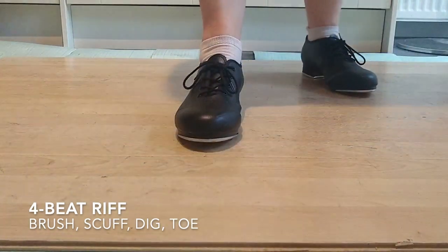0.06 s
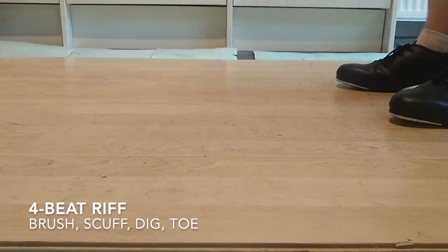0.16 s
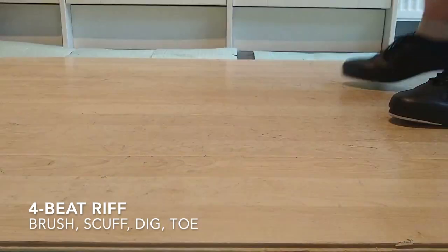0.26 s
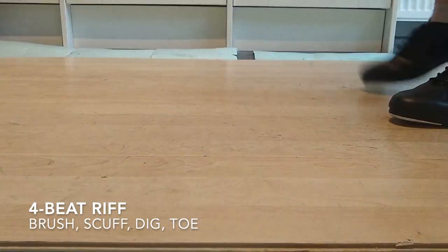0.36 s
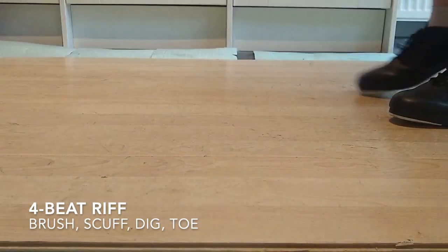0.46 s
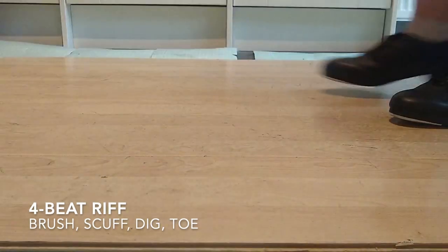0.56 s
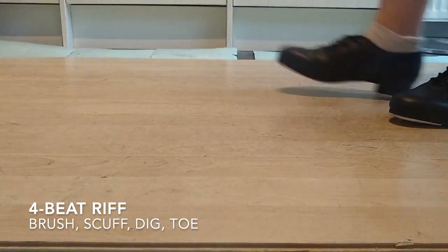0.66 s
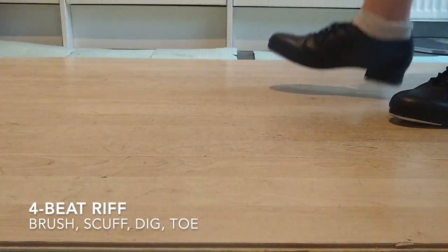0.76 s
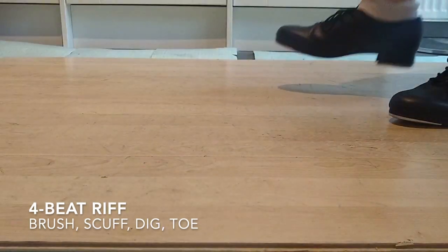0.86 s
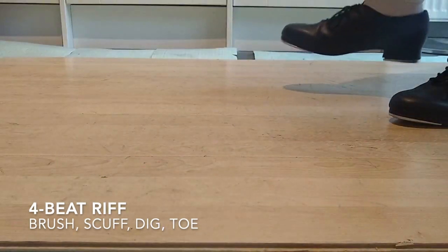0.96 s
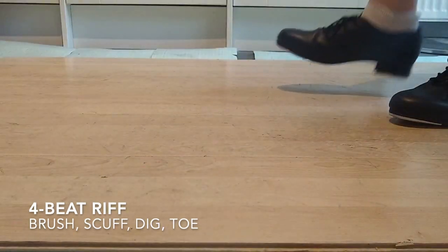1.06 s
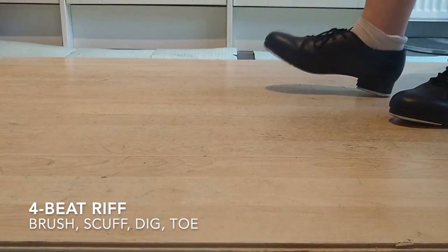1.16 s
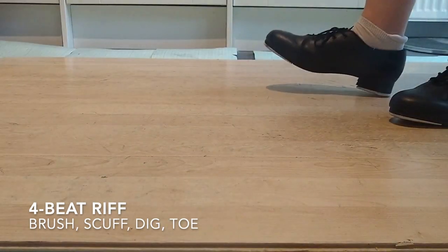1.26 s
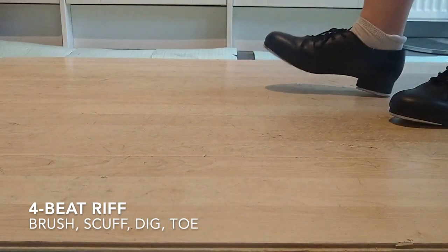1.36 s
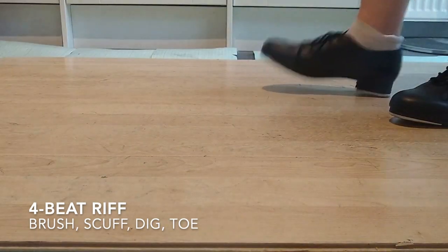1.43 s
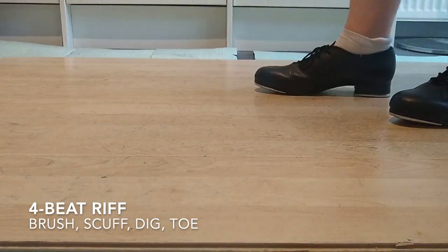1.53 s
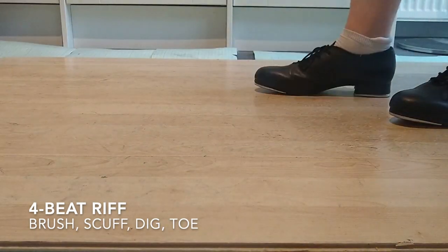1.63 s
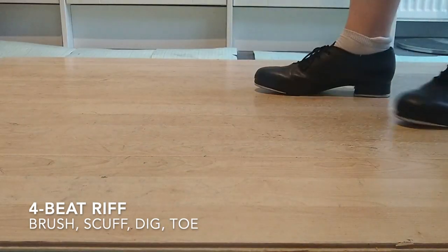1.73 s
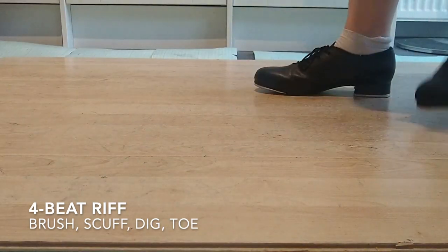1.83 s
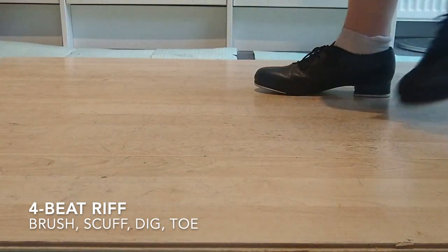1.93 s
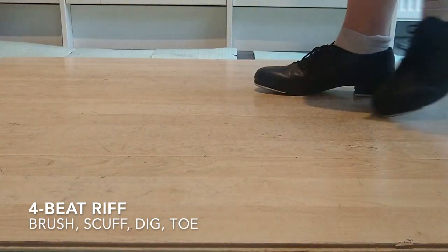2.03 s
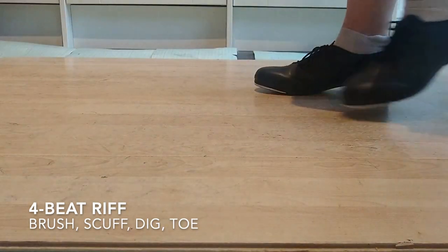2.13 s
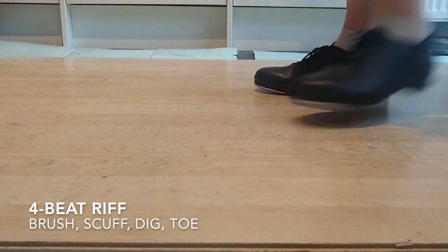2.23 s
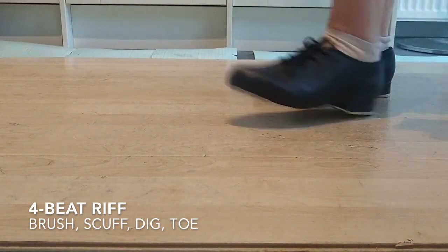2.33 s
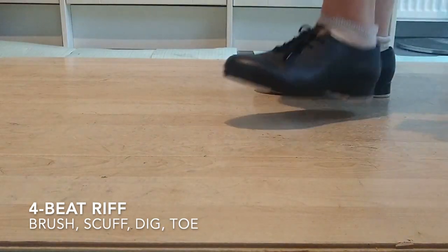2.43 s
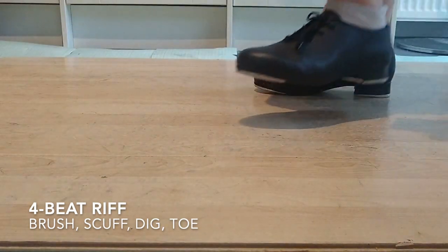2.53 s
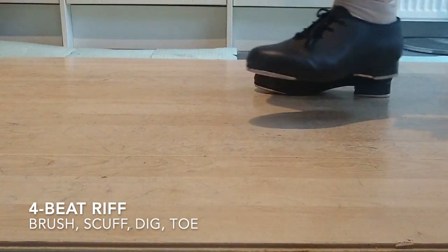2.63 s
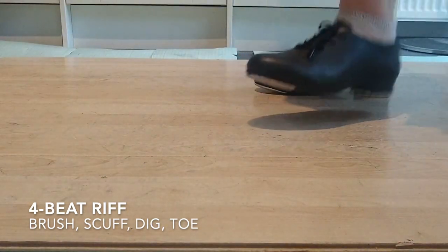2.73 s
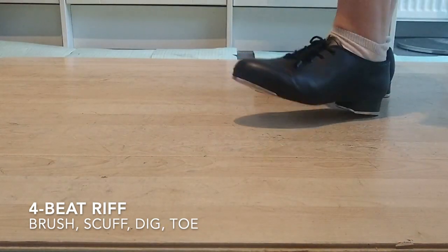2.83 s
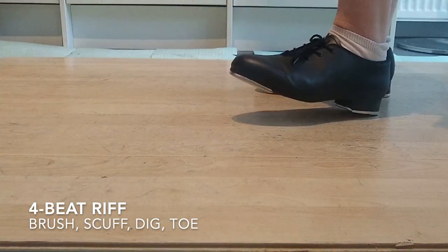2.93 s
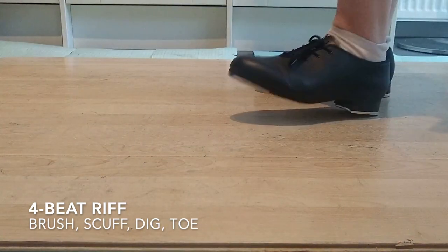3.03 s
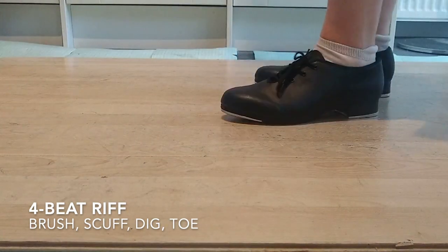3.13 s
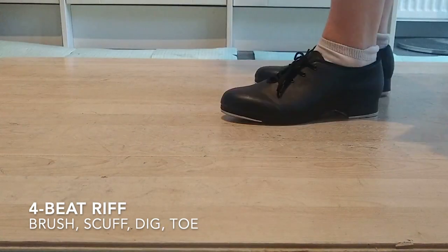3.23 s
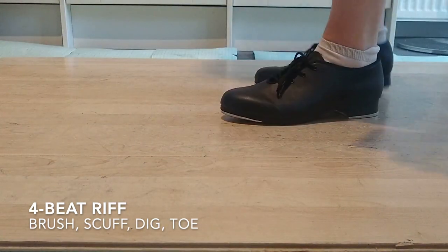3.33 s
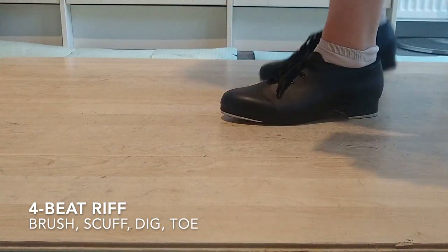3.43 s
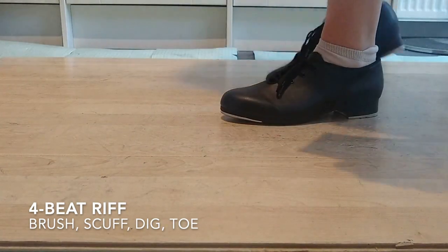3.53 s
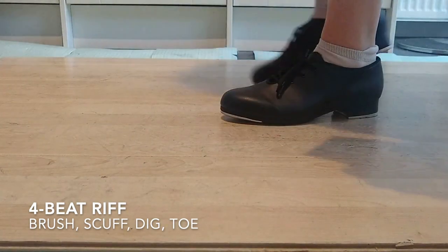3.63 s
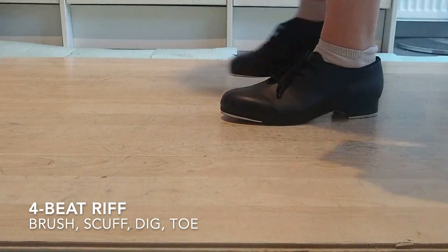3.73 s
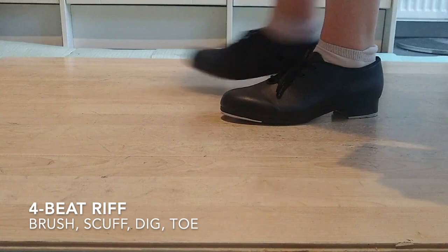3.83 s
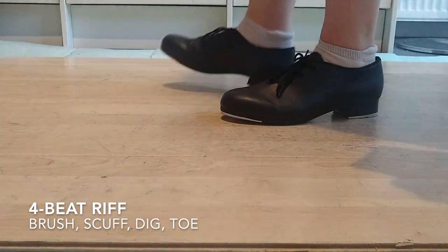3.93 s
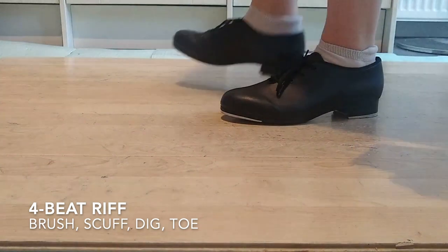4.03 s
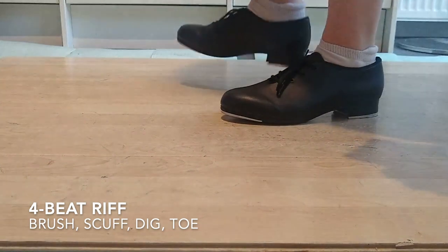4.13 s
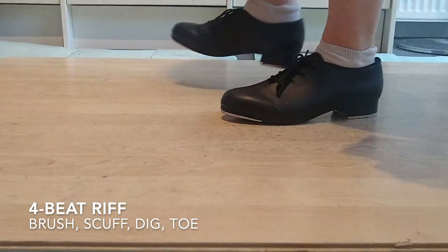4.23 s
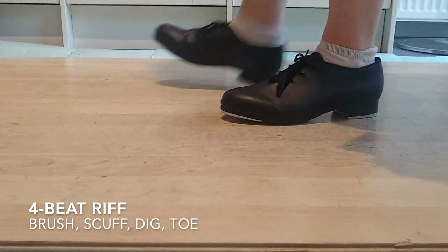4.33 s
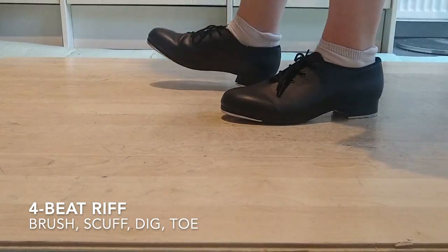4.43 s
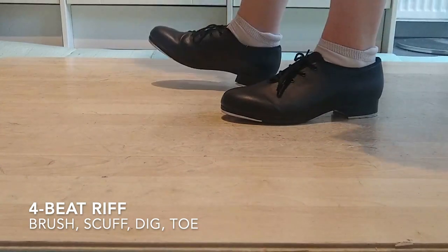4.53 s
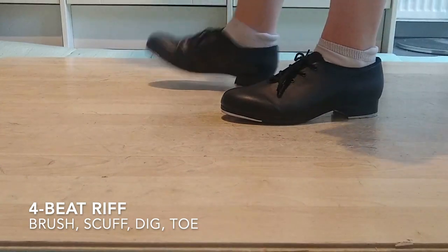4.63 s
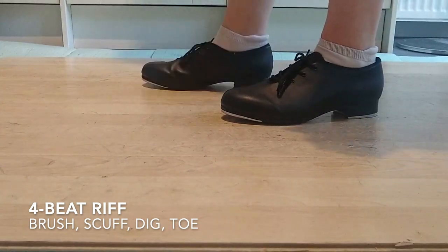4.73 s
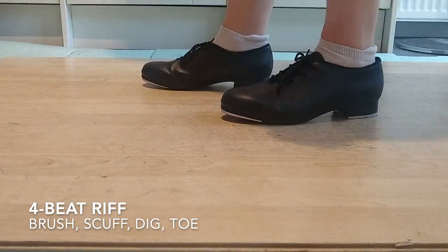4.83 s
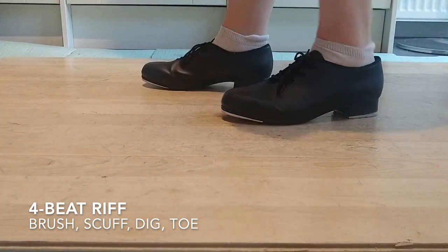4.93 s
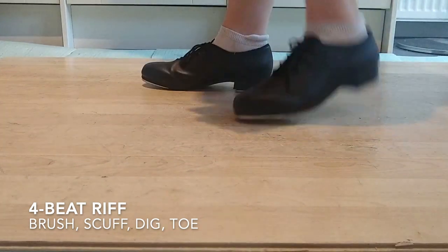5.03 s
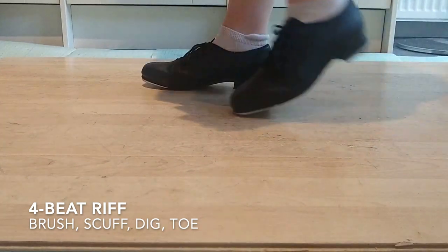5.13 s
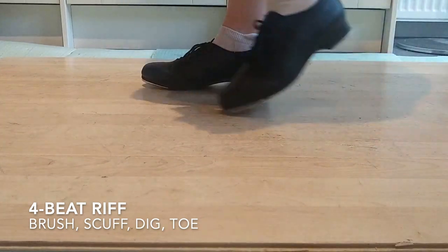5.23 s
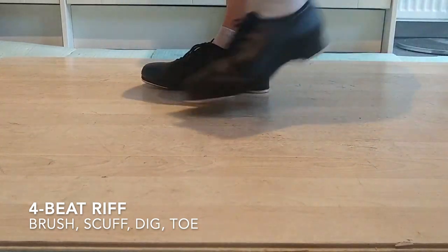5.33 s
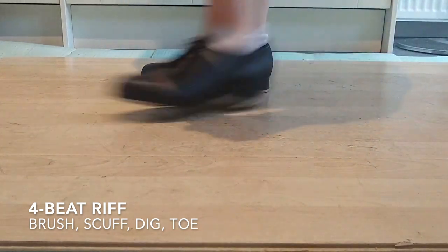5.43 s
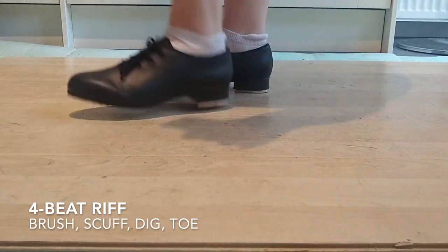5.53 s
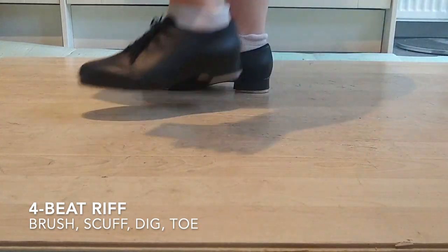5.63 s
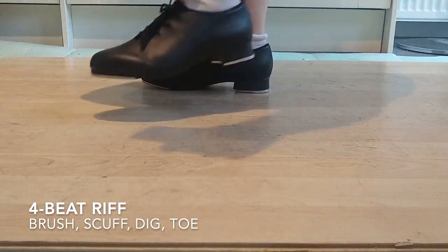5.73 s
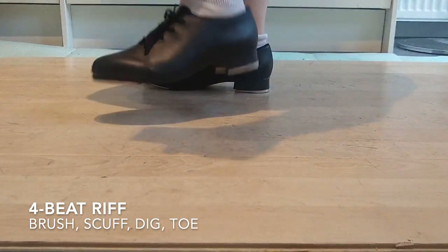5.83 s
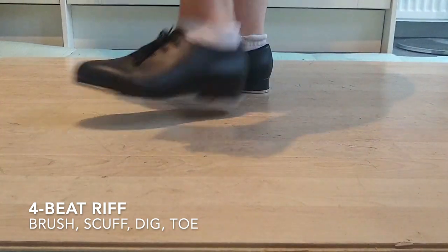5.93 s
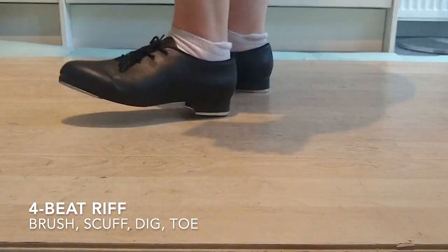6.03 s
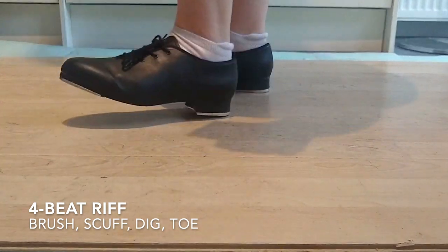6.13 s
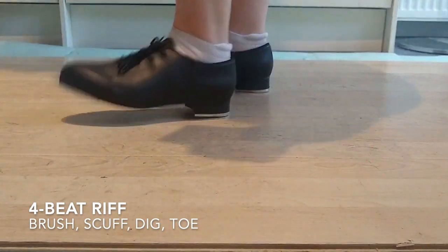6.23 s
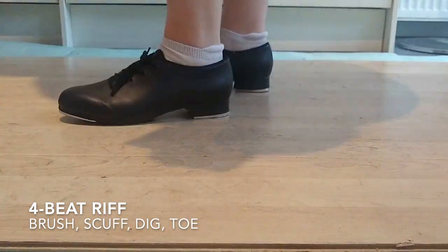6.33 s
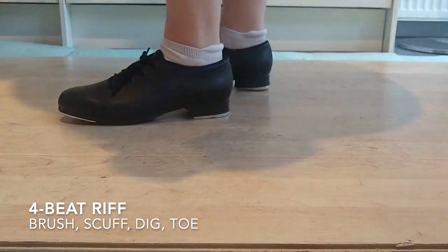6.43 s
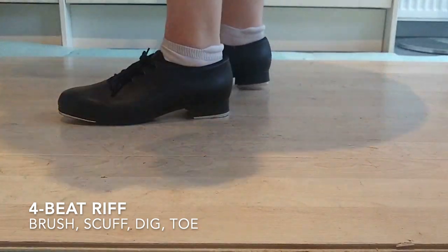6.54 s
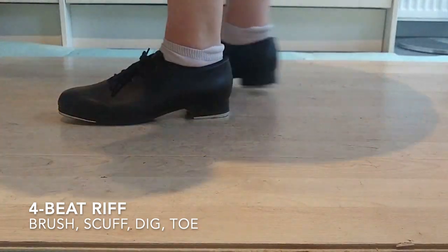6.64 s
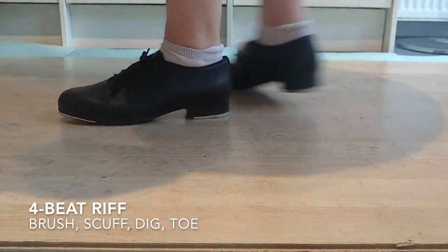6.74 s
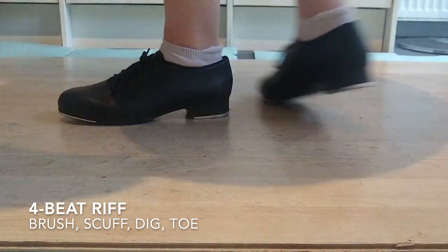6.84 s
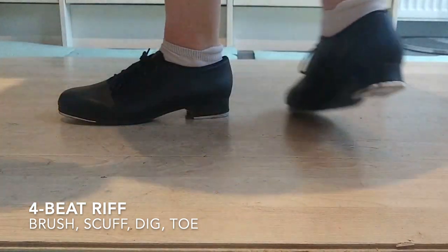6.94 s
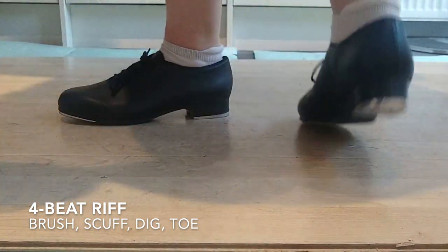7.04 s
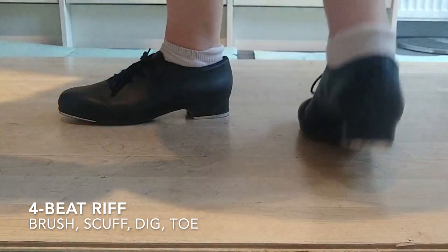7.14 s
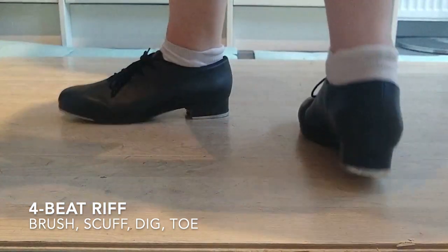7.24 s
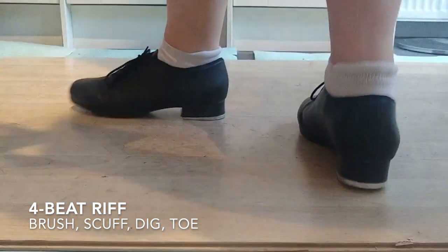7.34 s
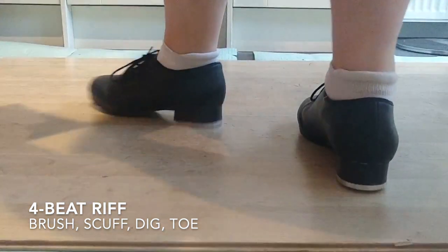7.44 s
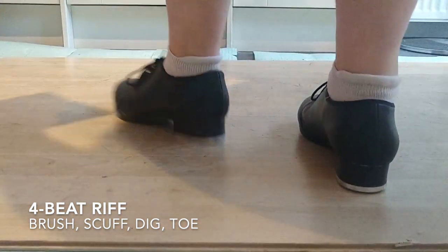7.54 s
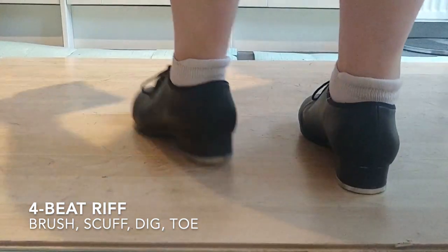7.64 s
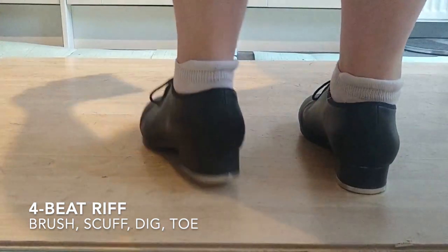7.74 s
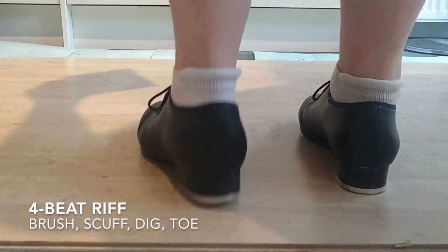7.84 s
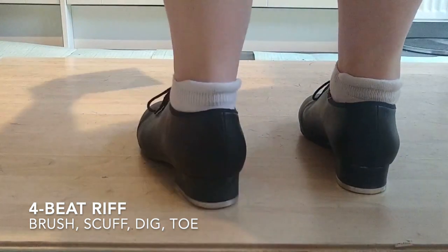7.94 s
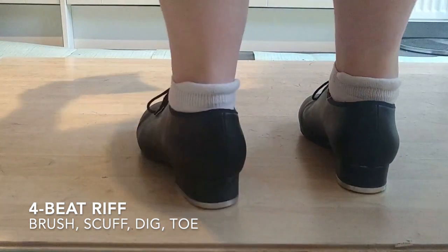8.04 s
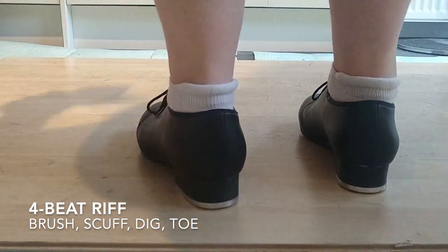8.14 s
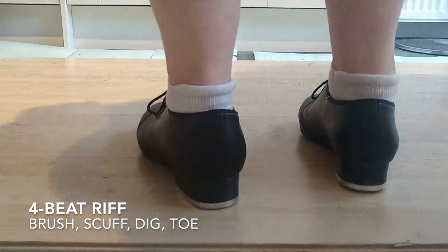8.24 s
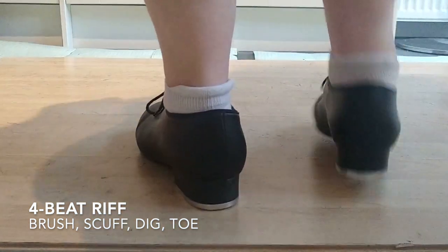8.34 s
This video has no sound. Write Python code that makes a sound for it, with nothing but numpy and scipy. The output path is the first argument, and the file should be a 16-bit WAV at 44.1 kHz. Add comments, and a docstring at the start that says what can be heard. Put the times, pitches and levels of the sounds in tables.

```python
"""Tap dance on a board

Steel-plated shoes tap across a wooden board in a bare room, close to a phone lying on the floor.
Each blow clicks the plate (shaped noise) and rings the board (damped modes); the room answers (decaying noise).
Soles slide as grainy noise over a steady hush; the first taps and their echoes break off at a cut.
The phone steers its two ports left and right, lowers the fading tails and holds the peaks down."""
import sys
import numpy as np
from scipy import signal
from scipy.fft import rfft, irfft, next_fast_len
from scipy.io import wavfile
from scipy.ndimage import uniform_filter1d, minimum_filter1d

SR = 44100
rng = np.random.default_rng(int(sys.argv[2]) if len(sys.argv) > 2 else 0)


def wav_out(sig):
    """Save sig, one row per channel (or a flat mono array), as 16-bit PCM at SR to the path in sys.argv[1]."""
    wavfile.write(sys.argv[1], SR, np.round(np.clip(np.atleast_2d(sig).T, -1, 1) * 32767).astype(np.int16))


N = 369558
LEAD = SR // 2  # samples kept ahead of time zero for a blow that starts earlier
SWELL_S = .006  # a faint swell of the ring leads into each click, this long
PORTS_S = 0.0004497  # sound needs this long from one port to the other


def gain_of(db):
    """Decibel definition: amplitude ratio of a level difference."""
    return 10 ** (np.asarray(db) / 20)


def evened(x):
    """Normalisation to unit root mean square."""
    return x / np.sqrt(np.mean(x ** 2) + 1e-20)


def read(points, hz):
    """Interpolation of (Hz, value) points along a logarithmic frequency axis."""
    f, value = np.transpose(points)
    return np.interp(np.log(hz + 1), np.log(f + 1), value)


def at_time(points, s):
    """Linear interpolation of (s, value) points."""
    return np.interp(s, *np.transpose(points))


def colour(x, points):
    """Zero-phase filtering: the spectrum is weighted by a table of (Hz, dB)."""
    hz = np.fft.rfftfreq(x.shape[-1], 1 / SR)
    return irfft(rfft(x) * gain_of(read(points, hz)), x.shape[-1])


def add(mix, s, sound):
    """Superposition: a sound joins the mix at its start time."""
    part = mix[:, round(s * SR) + LEAD:][:, :sound.shape[1]]
    part += sound[:, :part.shape[1]]


# modes of the wooden board: pitch_hz, level_db (relative), t60_s (at ring length factor 1)
BOARD_MODES = [(145, 11.5, 0.018), (177.6, 1.5, 0.033), (266, -5, 0.033), (318.2, -12.5, 0.047),
               (371.6, 10.5, 0.08), (398.3, -8, 0.23), (456.5, 3.5, 0.052), (520.4, -2, 0.042),
               (631, -3.5, 0.046), (705.3, -3, 0.056), (786.6, -3.5, 0.051), (892, -6.5, 0.037),
               (1022, -5, 0.019), (1288, -4, 0.018), (1523, -2, 0.018)]
# anchors of the ring's spectrum, pitch_hz: thud, deep, middle, high ring and knock
RING_ANCHORS = (205, 341, 429.5, 770, 1310)
KNOCK_DB = -11.5  # the knock sits under the tilt
THUD_DB, THUD_PER_LENGTH_DB = -7.5, -24.5  # a weighted blow rings short and thuds deep


def board_ring(t, row, chance):
    """Modal synthesis: damped sinusoids whose levels depend on the spot of the blow."""
    _, click_db, mid_db, deep_db, tilt_db, _, length = row
    octaves = np.log2(np.array(RING_ANCHORS[3:]) / RING_ANCHORS[2])
    high_db, knock_db = mid_db + tilt_db * octaves
    thud_db = click_db + THUD_DB + THUD_PER_LENGTH_DB * length
    anchor_db = (thud_db, mid_db + deep_db, mid_db, high_db, knock_db + KNOCK_DB)
    hz, db, t60 = (column[:, None] for column in np.transpose(BOARD_MODES))
    spot_db = np.interp(np.log(hz), np.log(RING_ANCHORS), anchor_db)
    detune = 1 + 0.022 * chance[-len(hz):, None]
    phase = 0.15 * chance[-2 * len(hz):-len(hz), None]  # the modes do not start quite in step
    decay_db = 60 * np.maximum(t, 0) / (t60 * length)
    modes = gain_of(db + spot_db + 0.5 - decay_db) * np.sin(2 * np.pi * (hz * detune * t + phase))
    # a faint swell leads into the click, then the ring builds up within a few ms
    swell = np.where(t < 0, .07 * np.exp(t / .002), 1 - .95 * np.exp(-t / .0005))
    return modes.sum(0) * swell


# spectrum of the steel plate: pitch_hz, level_db (relative, before the edge of each blow)
PLATE_COLOUR = [(800, 2), (1800, 7.5), (3200, 5), (4400, 2.5), (5500, -1.5), (6800, -5), (9500, -12.5),
                (13000, -14), (16500, -31.5)]


def plate_click(t, row, chance):
    """Impact excitation: an impulse and decaying chatter, as heard directly and all round."""
    _, click_db, _, _, _, edge_db, length = row
    # the loose plate chatters on its screws
    rattle = chance * (t > 0) * (.5 * np.exp(-t / 0.00089) + 0.11 * np.exp(-t / 0.017))
    strike = -signal.unit_impulse(len(t), np.argmax(t > 0))
    bright_db = edge_db + 22.5  # full from 8 kHz up, none below 4 kHz
    plate = [(f, db + bright_db * np.clip(f / 4000 - 1, 0, 1)) for f, db in PLATE_COLOUR]
    # over all directions the chatter evens out, so the room is fed a plain click
    direct = rattle + 2.33 * length * strike
    all_round = 0.073 * rattle + 4.19 * strike
    return gain_of(click_db + 0.5) * colour(np.array([direct, all_round]), plate)


def blow(row, chance):
    """Superposition of plate click and board ring; one row as heard directly, one all round."""
    t = np.arange(len(chance)) / SR - SWELL_S
    return board_ring(t, row, chance) + plate_click(t, row, chance)


def at_ports(sound, lead_ms):
    """Interaural-style cues: time lead between the ports, and shading by the phone's body."""
    hz = np.fft.rfftfreq(len(sound), 1 / SR)
    delay_ms = np.array([[.5 - lead_ms / 2], [.5 + lead_ms / 2]])
    late = np.exp(-2j * np.pi * hz * delay_ms / 1000)
    shading = gain_of([[1.5], [-1.5]])
    return irfft(rfft(sound) * late * shading, len(sound))


# level of the room's answer, lower where the dancer is near the phone: time_s, level_db (relative)
ROOM_SHARE = [(.1, 0.5), (.55, 0.5), (.9, -4), (2.1, -4), (3.5, -4.5), (5.5, -8), (6.9, -8.5), (7.2, -12.5),
              (8, -14.5)]
# direction of the direct sound: time_s, lead_ms (sooner at the left port)
BEARING = [(2.5, -.02), (3.7, -.014), (4, .015), (6.4, .02), (7, -.015), (7.3, .014)]


def shoes(rows, tails):
    """Direct and reverberant field: every blow at the ports, and convolved with its room tail."""
    mix = np.zeros((2, N + LEAD))
    chance = rng.standard_normal((len(rows), 8192))
    for row, draw, tail in zip(rows, chance, tails):
        direct, all_round = blow(row, draw)
        start = row[0] - SWELL_S
        add(mix, start, at_ports(direct, at_time(BEARING, row[0])))
        answer = signal.fftconvolve(all_round[None], tail, axes=1)
        add(mix, start, gain_of(at_time(ROOM_SHARE, row[0])) * answer)
    return mix[:, LEAD:]


# soles sliding on the board: full_from_s, level_db (relative), rise_s, hold_s, fall_s
SLIDES = [(0.319, -46, 0.079, 0.056, 0.24), (1.887, -41.5, 0.17, 0.0092, 0.017),
          (6.969, -28, 0.0089, 0.043, 0.051), (7.158, -39.5, .01, 0.022, 0.024),
          (7.402, -44, 0.091, 0.068, 0.062), (7.607, -33, 0.046, 0.017, 0.07),
          (7.682, -33, .02, 0.026, 0.068), (7.74, -33, .06, 0.024, 0.06), (7.853, -47, .2, 0.093, 0.11)]
SLIDE_ENDS_DB = -28  # relative level one rise before, or one fall after, the full slide


def slide_level(t, full, db, rise, hold, fall):
    """Exponential envelope: a slide swells, holds and dies away."""
    away = np.maximum((full - t) / rise, (t - full - hold) / fall)
    return gain_of(db + SLIDE_ENDS_DB * np.maximum(away, 0))


# spectrum of a sliding sole: pitch_hz, level_db (relative)
SLIDE_COLOUR = [(150, -9.5), (380, -0.5), (460, 9.5), (560, -5), (1200, -9.5), (3200, -11.5), (6000, -25.5),
                (15000, -39.5)]


def slides(tail):
    """Friction noise: grit under the sole slips in uneven grains, coloured and echoed by the room."""
    t = np.arange(N) / SR
    grain_db = 1.38 * rng.exponential(1, N // 64 + 1)
    grit = rng.standard_normal(N) * gain_of(grain_db).repeat(64)[:N]
    level = sum(slide_level(t, *row) for row in SLIDES)
    dry = evened(colour(grit, SLIDE_COLOUR)) * uniform_filter1d(level, 400)
    answer = signal.fftconvolve(dry[None], tail, axes=1)[:, :N]
    return 0.47 * dry + gain_of(-16.5) * answer


def diffuse(noise):
    """Diffuse-field coherence: sound from all sides is alike in the bass, unrelated in the treble."""
    same = .97 * np.sinc(2 * np.fft.rfftfreq(noise.shape[-1], 1 / SR) * PORTS_S)
    a, b = rfft(noise[..., 0, :]), rfft(noise[..., 1, :])
    return irfft(np.stack([a, same * a + np.sqrt(1 - same ** 2) * b], -2), noise.shape[-1])


# reverberation time of the room: pitch_hz, t60_s
ROOM_DECAY = [(120, 0.43), (320, 0.41), (840, 0.63), (2200, 0.72), (5800, 0.68), (14000, 0.45)]
# spectrum of the room's answer: pitch_hz, level_db (relative)
ROOM_COLOUR = [(100, 13.5), (250, 4.5), (500, -0.5), (1000, 4.5), (3000, 4.5), (7000, 2.5), (15000, -0.5)]
# standing waves of the room: pitch_hz, level_db (relative), t60_s
STANDING = [(95, -16, 0.15), (147.1, -18.5, 0.61), (193.2, -13.5, 0.43), (294, -23, 0.57)]


def rooms(count):
    """Statistical reverberation: one noise tail pair a spot, each band dying at its own speed."""
    hz, t, z = signal.stft(diffuse(rng.standard_normal((count, 2, 32768))), SR, nperseg=512)
    decay_db = 60 * t / read(ROOM_DECAY, hz)[:, None]
    z = z * gain_of(read(ROOM_COLOUR, hz)[:, None] - decay_db)
    tails = signal.istft(z, SR, nperseg=512)[1]
    t = np.arange(tails.shape[-1]) / SR
    for f, db, t60 in STANDING:
        phase = 0.38 * rng.random((count, 2, 1))
        tails = tails + gain_of(db - 60 * t / t60) * np.sin(2 * np.pi * (f * t + phase))
    late_rise = 1 + .5 * (t > .088) * np.exp(-(t - .088) / 0.011)  # the tail swells again briefly after 88 ms
    near_walls = 1 + 0.15 * np.exp(-t / 0.026)  # the closest surfaces are loudest
    onset = np.clip((t - .003) / 0.0047, 0, 1)  # near walls answer after a few ms
    return tails * late_rise * near_walls * onset / np.sqrt(0.032 * SR)


# spectrum of the room's hush: pitch_hz, level_db (relative, per Hz)
HUSH_COLOUR = [(24, -26.5), (40, -9.5), (197, -3.5), (621, -14), (797, -11), (2220, -13), (2990, -20),
               (15500, -39)]


def hush():
    """Stationary diffuse noise: the steady background of the room, shaped by its spectrum."""
    noise = diffuse(rng.standard_normal((2, N)))
    return gain_of(-55.5) * evened(colour(noise, HUSH_COLOUR))


# blows of the shoes: start_s, click_db (plate), mid_db (board ring), deep_db (deep ring over mid ring),
# tilt_db_per_octave (ring, upward), edge_db (plate edge over click), length_factor (ring, short under weight)
BLOWS = [(.1085, -43, -49.5, 13, -15, -28, 1.2), (.1595, -19.5, -39, 13.5, -10, -38, 1.15),
         (.1794, -24.5, -30, -5, -7, -51, 0.77), (.5189, -8, -23, -3, 11, -25, 0.92),
         (.7637, -11.5, -20, -10.5, 6, -27.5, 1.12), (1.2726, -7.5, -15.5, -11.5, 4, -31, 1.15),
         (1.601, -11, -25.5, -1.5, 1, -28.5, 0.92), (1.6128, -6, -25, 8, 9.5, -24.5, 0.53),
         (1.9945, -36.5, -75.5, 5, 36, -20, 0.75), (2.0935, -3, -11.5, -44, -10, -24.5, 1.33),
         (2.4178, -10.5, -14, -47.5, 3, -20.5, 0.98), (2.919, -11, -11.5, -39.5, -0.5, -22, 1.1),
         (3.2247, -21, -24.5, -11, -3, -21, 0.53), (3.2365, -3, -19, -4, 4, -25.5, 0.41),
         (3.6624, -9, -15.5, -10.5, 1.5, -33, 0.88), (3.9931, -9, -11, -11.5, 4, -31, 0.81),
         (4.4688, -3.5, -7.5, -12.5, -12.5, -29.5, 1.05), (4.799, -18, -37.5, 16, 8, -40.5, 0.82),
         (4.8108, 0.5, -16, -5.5, 1, -30.5, 0.49), (5.2535, -8, -13, -21.5, -15, -29, 0.67),
         (5.586, -7, -11, -21.5, 4, -15, 1.08), (6.0974, -7.5, -10.5, -14.5, -1, -24, 1.5),
         (6.4142, -4, -17.5, -3, 10.5, -27, 0.38), (6.9628, -19, -37.5, 2.5, 5.5, -47, 2),
         (7.1545, -21, -21, -35, -0.5, -41, 1.04), (7.3416, -28, -36, 3, -27, -42, 0.46),
         (7.47, -20, -21.5, -16, -1, -27, 0.62), (7.497, -23.5, -26, -29, -4, -26, 0.58),
         (7.9708, -50, -38, -12, -11, -30, 0.77), (8.0092, -16.5, -18.5, -20, -16, -46, 0.48),
         (8.025, -21, -25, -20.5, 1, -32, 0.82)]
# a blow just before the start, heard only as its fading tail; columns as above
EARLIER_BLOW = (-.2, -8, -25, 3, 2, -14, .9)
CUT_S = 0.198  # the opening taps and their echoes break off here


def scene():
    """Superposition: two passages of taps joined by a cut, with slides and hush running throughout."""
    rows = [EARLIER_BLOW] + list(BLOWS)
    tails = rooms(count=len(rows))
    opening = sum(row[0] < CUT_S for row in rows)
    before_cut = np.clip((CUT_S - np.arange(N) / SR) / 0.0024, 0, 1)
    taps = before_cut * shoes(rows[:opening], tails) + shoes(rows[opening:], tails[opening:])
    return taps + slides(tails[0]) + hush()


def steer(dry):
    """Delay-and-subtract directivity: each side subtracts the other port, delayed."""
    size = next_fast_len(N + 4096)
    a, b = rfft(dry, size)
    jf = 1j * np.fft.rfftfreq(size, 1 / SR)
    late = 0.69 * np.exp(-2 * np.pi * jf * PORTS_S) / (1 + (abs(jf) / 7000) ** 3)
    # bass restored after the subtraction, rumble cut
    lift = (1 + 350 / (jf + 90)) * (jf / (jf + 200)) ** 2.265
    return irfft(np.array([a - late * b, b - late * a]) * lift * 0.85, size)[:, :N]


def lower_tails(x):
    """Downward expansion: half a dB less for each dB of smoothed power under -42 dB, at most 7 dB."""
    power = signal.lfilter([.002], [1, .002 - 1], (x ** 2).mean(0))
    under_db = np.clip(-42 - 10 * np.log10(power + 1e-12), 0, 14)
    return x / gain_of(.5 * np.minimum(under_db, uniform_filter1d(under_db, 800)))


def limit(x):
    """Look-ahead limiting: the gain falls just ahead of each peak and recovers within tens of ms."""
    over_db = np.maximum(20 * np.log10(abs(x).max(0) / .97 + 1e-9), 0)
    fall = np.arange(N) * 100.0 / SR  # recovery at 100 dB a second
    held_db = -minimum_filter1d(fall - np.maximum.accumulate(over_db + fall), 129)
    return x / gain_of(uniform_filter1d(held_db, 65))


def record(dry):
    """Signal chain of the phone: port steering, tail expander, peak limiter, band limit."""
    held = limit(lower_tails(steer(dry)) * 1.218)
    low_pass = signal.firwin(511, 16500, window=("kaiser", 9), fs=SR)  # edge at 16500 Hz
    return signal.oaconvolve(held, low_pass[None], "same")


dry = scene()
out = record(dry)
wav_out(out)
```